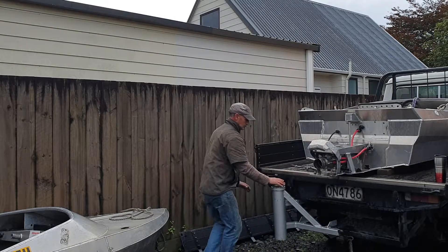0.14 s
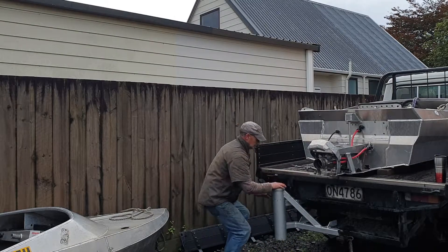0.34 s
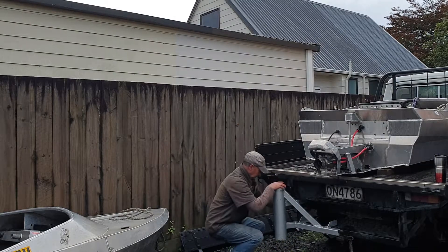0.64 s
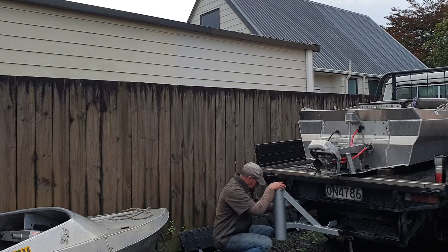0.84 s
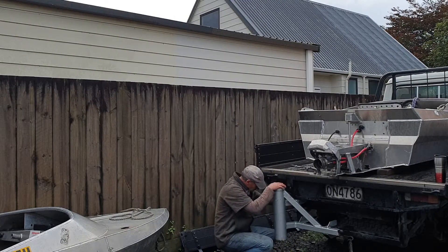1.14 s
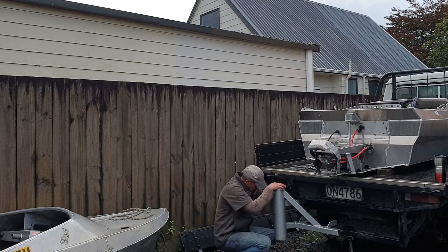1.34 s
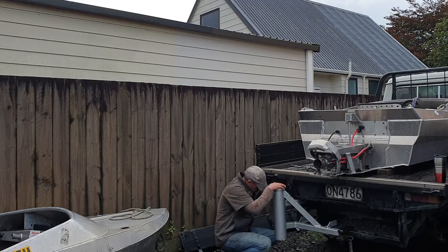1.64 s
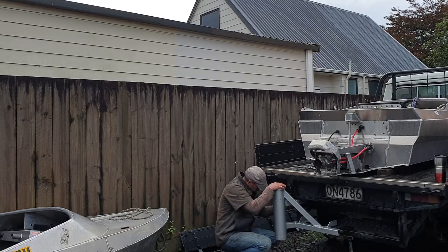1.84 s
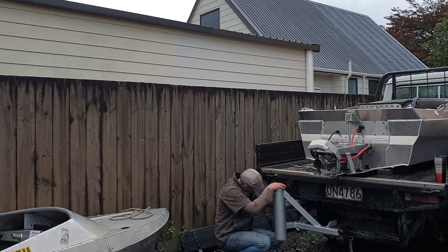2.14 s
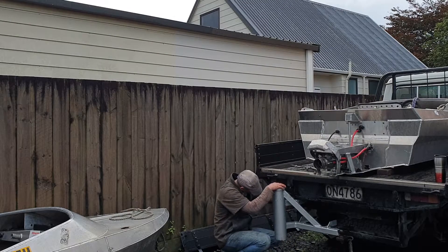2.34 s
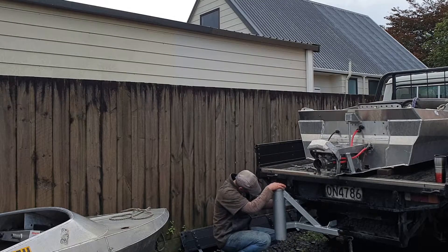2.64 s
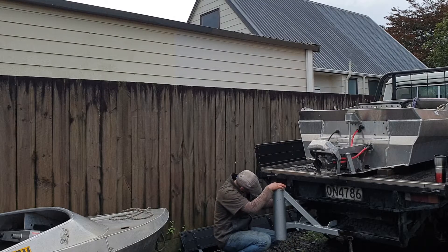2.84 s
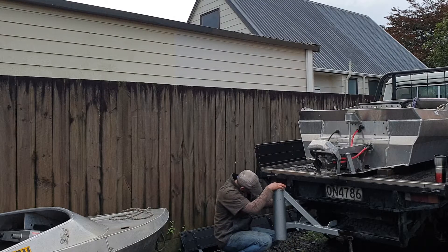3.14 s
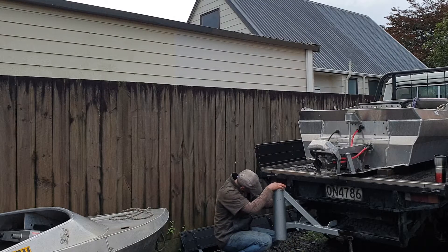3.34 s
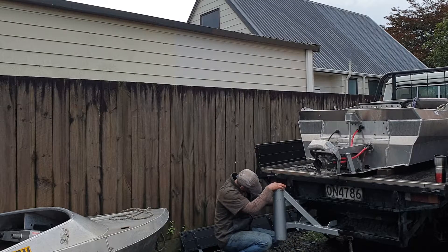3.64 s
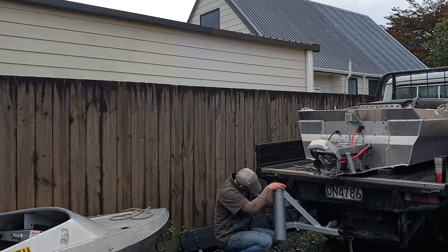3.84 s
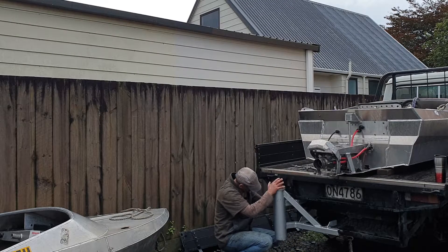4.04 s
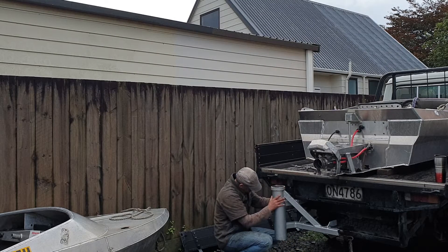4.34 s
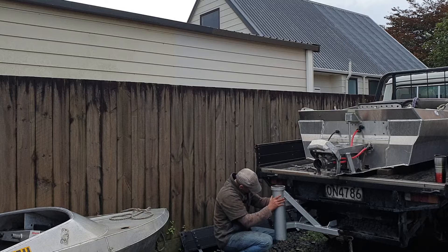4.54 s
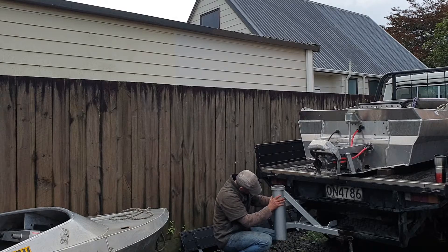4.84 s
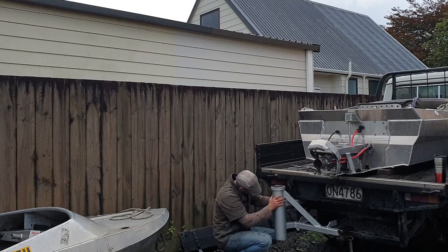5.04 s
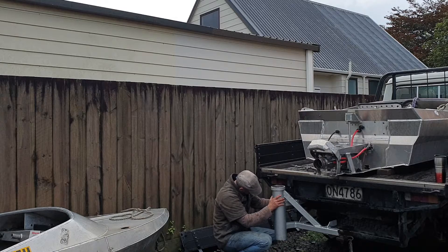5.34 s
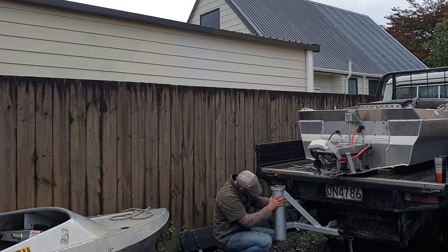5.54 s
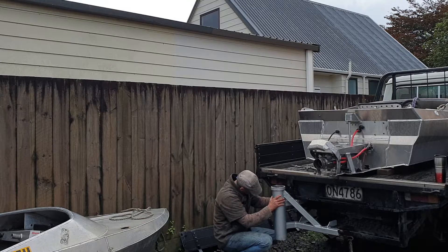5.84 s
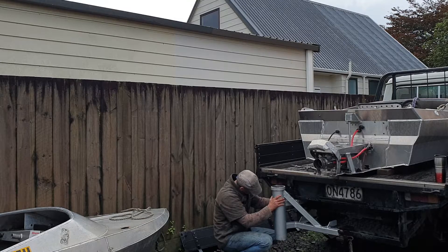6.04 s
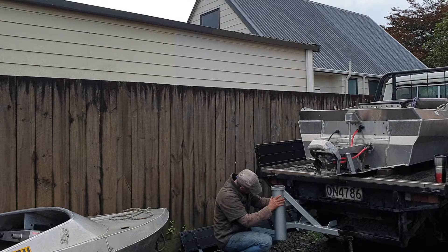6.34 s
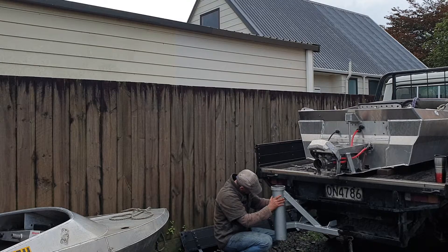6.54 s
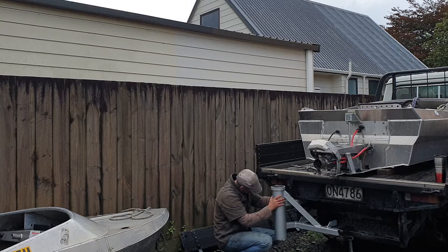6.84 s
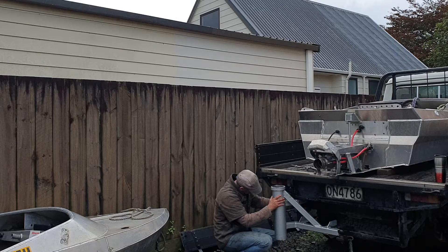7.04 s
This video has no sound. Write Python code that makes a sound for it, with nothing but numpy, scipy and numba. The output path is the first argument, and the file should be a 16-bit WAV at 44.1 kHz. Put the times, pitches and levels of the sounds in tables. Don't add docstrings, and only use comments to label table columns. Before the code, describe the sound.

A fenced yard outdoors, heard in stereo from a few metres, with faint, low town hum swelling gently throughout. From 0 to about 1.1 seconds boots shift on gravel: a crunch near 0.1, scattered stone clicks, and a sharp dry click at 0.9, fading into soft grit. At about 1.7 a steel post is twisted stiffly in a dry socket, with a longer, lower, rougher squeal that jumps to a very high pitch near 1.9, over dull rumble and scraping. Short, piercing squeaks around 6 kilohertz follow at 2.6, 3.2, 3.8, 4.5, 5.0, 5.6, 6.1 and 6.7, each about a tenth of a second, wavering slightly, with a low grinding thump beneath. The one at 3.25 is loudest. A tiny stone ticks at 2.8; faint gravel shifts near 4.1. Fence echoes and a brief tail follow each squeak. A last weak squeak at 7.2 is cut short.

```python
import sys
import numpy as np
from scipy import signal
from scipy.fft import rfft, irfft, next_fast_len
from scipy.io import wavfile
from scipy.ndimage import uniform_filter1d
from numba import njit

SR = 44100
rng = np.random.default_rng(int(sys.argv[2]) if len(sys.argv) > 2 else 0)


def wav_out(sig):
    wavfile.write(sys.argv[1], SR, np.round(np.clip(np.atleast_2d(sig).T, -1, 1) * 32767).astype(np.int16))


def ratio(d):
    e = np.asarray(d, float) / 20
    return 10 ** e


N = 317079
T = np.arange(N) / SR

# start [t/s], length [t/s], rumble [level/dB], knock re rumble [level/dB],
# second harmonic of the squeal [level/dB]
TWISTS = [
    (1.668, 0.23, -45.5, -13, -12),
    (2.586, 0.068, -36, -12.5, -8),
    (3.217, 0.11, -42.5, -11, -13.5),
    (3.81, 0.072, -38, -10.5, -5.5),
    (4.454, 0.098, -43, -14.5, -7.5),
    (5.047, 0.12, -43.5, -16, -11),
    (5.594, 0.099, -42, -16, -5),
    (6.145, 0.065, -39.5, -14, -5),
    (6.647, 0.11, -40, -15, -8),
    (7.184, .05, -46, -10.5, -11),
]


def unit(x):
    return x / np.sqrt(np.mean(x ** 2))


@njit
def svf(x, hz, width_hz):
    y, band, low = np.empty(len(x)), 0., 0.
    g, k = np.tan(np.pi * hz / SR), width_hz / hz
    for i in range(len(x)):
        v = (band + g * (x[i] - low)) / (1 + g * (g + k))
        band, low, y[i] = 2 * v - band, low + 2 * g * v, k * v
    return y


def svf_twice(x, hz, width_hz):
    return svf(svf(x, 1. * hz, 1. * width_hz), 1. * hz, 1. * width_hz)


def walk(rate_hz):
    k = int(SR / rate_hz)
    held = rng.standard_normal(8192)[np.arange(N) // k]
    return 1.93 * uniform_filter1d(uniform_filter1d(held, k), k)


def read(table):
    s, *columns = np.transpose(table)
    stop = int(s[-1] * SR) if s[-1] < T[-1] - .03 else N
    span = slice(max(int(s[0] * SR), 0), stop)
    return span, [np.interp(T[span], s, c) for c in columns]


def shape(s, hold_s, rise_db_s, fall_db_s, depth_db=45):
    start_s, stop_s = s - depth_db / rise_db_s, s + hold_s + depth_db / fall_db_s
    span = slice(max(int(start_s * SR), 0), int(stop_s * SR))
    t = T[span] - s
    return span, t, np.minimum(np.minimum(t * rise_db_s, 0), (hold_s - t) * fall_db_s)


def slip(chance, hz, harmonics_db, jitter, chatter_db):
    waver, chatter, *flutter = chance
    phase = 2 * np.pi * np.cumsum(hz * (1 + jitter * waver)) / SR
    tone = sum(ratio(db + 1.5 * flutter[k]) * np.sin((k + 1) * phase) for k, db in enumerate(harmonics_db))
    return np.sqrt(2) * tone * (1 + ratio(chatter_db) * chatter) * signal.windows.tukey(len(hz), .08)


def squeals():
    # start [t/s], hold [t/s], slip rate [f/Hz], level [level/dB],
    # left minus right [level/dB]
    upper_locks = [(1.868, 0.021, 5730, -23.5, 4), (1.894, .008, 5778, -21.5, 3.5),
                   (2.594, 0.011, 5900, -18.5, 12), (2.61, .042, 5832, -26, 9),
                   (3.253, 0.028, 6020, -14, 6.5), (3.287, .03, 6065, -25, 2.5),
                   (3.797, 0.052, 5910, -23.5, 5), (3.859, 0.032, 5670, -28.5, 11.5),
                   (4.508, .014, 6020, -25, 4.5), (4.529, 0.044, 5900, -29, 13),
                   (5.045, 0.045, 5870, -24.5, 4), (5.078, 0.027, 5830, -21.5, 13.5),
                   (5.624, 0.014, 5890, -23, 12), (5.642, 0.033, 5930, -25.5, 9.5),
                   (5.691, 0.033, 5867, -27, 12), (6.135, .018, 5958, -24, 9.5),
                   (6.158, .03, 5764, -31.5, 6.5), (6.676, 0.028, 5835, -20.5, 11),
                   (6.703, .02, 5900, -20, 7), (6.727, 0.032, 5870, -28, 7), (7.166, .03, 5880, -30.5, 3.5)]
    # start [t/s], slip rate [f/Hz], level [level/dB]
    bites = [
        (2.577, 5847, -21.5),
        (3.233, 5854, -26),
        (4.489, 5967, -30.5),
        (5.026, 5990, -32),
        (5.612, 6035, -29.5),
        (6.112, 5860, -30),
        (6.663, 5796, -27.5),
    ]
    # start [t/s], hold [t/s], level [level/dB], left minus right [level/dB]
    low_locks = [
        (1.68, .02, -33, -9),
        (1.696, .04, -19.5, -9),
        (1.703, .018, -23.5, -4.5),
        (1.727, .043, -20, -3.5),
    ]
    low_hz = [3015, 3772, 3600, 3450]
    # second, third, fourth harmonic of each low lock [level/dB]
    low_harmonics_db = [(-2, -26, -28), (-27.5, -36, -48.5), (-0.5, -13, -29.5), (-13, -22, -37)]
    # start [t/s], length [t/s], start rate [f/Hz], end rate [f/Hz], level [level/dB]
    slides = [
        (3.245, .025, 5700, 5350, -35),
        (5.10, .035, 5680, 5480, -29),
        (3.89, .03, 5650, 5480, -41.5),
        (2.605, .05, 6450, 6250, -40),
        (6.13, .04, 6500, 6400, -52),
    ]

    chatter = signal.sosfilt(signal.butter(6, 800, fs=SR, output="sos"), rng.standard_normal(N))
    chance = np.array([walk(250), unit(chatter)] + [walk(150) for _ in range(4)])
    out, starts = np.zeros((2, N)), np.array(TWISTS)[:, 0]

    def second_db(s):
        return TWISTS[np.argmin(abs(starts + .05 - s))][4]

    upper_mode = dict(sag_hz_s=402, jitter=.006, chatter_db=-24.5)
    low_mode = dict(sag_hz_s=0, jitter=.004, chatter_db=-28)
    catches = []
    for s, hold_s, hz, db, pan_db in upper_locks:
        detune_db, aside_db = .03 * max(5900 - hz, 0), .5 * (pan_db - 6.5)
        catches.append((s, hold_s, hz, db, pan_db, [second_db(s) - detune_db - aside_db], upper_mode))
    for (s, hold_s, db, pan_db), hz, harmonics_db in zip(low_locks, low_hz, low_harmonics_db):
        catches.append((s, hold_s, hz, db, pan_db, harmonics_db, low_mode))
    for s, hz, db in bites:
        catches.append((s, .016, hz, db, -0.5, [second_db(s) - 4], upper_mode))

    for s, hold_s, hz, db, pan_db, harmonics_db, mode in catches:
        span, t, fade_db = shape(s, hold_s, rise_db_s=3299.5, fall_db_s=1598)
        rate_hz = hz - mode["sag_hz_s"] * t
        tone = slip(chance[:, span], rate_hz, [0, *harmonics_db], mode["jitter"], mode["chatter_db"])
        balance_db = np.array([[1], [-1]]) * (pan_db / 2 + 2 * chance[-1, span])
        droop_db = 70.5 * t
        out[:, span] += tone * ratio(db + fade_db - droop_db + balance_db)
    for s, length_s, start_hz, end_hz, db in slides:
        span, (hz,) = read([(s, start_hz), (s + length_s, end_hz)])
        tone = slip(chance[::-1, span], hz, [db, db - 11.5], jitter=0.028, chatter_db=-8.5)
        out[:, span] += tone * ratio([[2.5], [-2.5]])
    return out


def ring(x, modes, patchy_db=0):
    return unit(sum(ratio(db + patchy_db * walk(14)) * unit(svf_twice(x, hz, 1.3 * width_hz))
                    for hz, width_hz, db in modes))


def grains(rate_hz, spread_db):
    hits = (rng.random(N) < rate_hz / SR) * rng.standard_normal(N)
    return hits * ratio(spread_db * np.minimum(rng.exponential(size=N), 3.5))


def grind():
    # centre [f/Hz], width [f/Hz], level [level/dB]
    frame = [(91, 42, -5), (129.4, 49, 3), (183, 43, -1.5), (300, 100, -1.5)]
    brace = [(477, 180, 4.5), (826.3, 70, 5)]
    tube_wall = [(1300, 620, -5.5), (1850, 500, 2.5), (2880, 1200, 2), (3613, 740, -0.5), (4370, 420, 1),
                 (7360, 740, -1)]
    # start [t/s], length [t/s], level [level/dB]
    scrapes = [
        (1.673, 0.22, -50.5),
        (2.591, 0.11, -53.5),
        (3.207, .14, -59),
        (3.797, 0.11, -50),
        (4.453, 0.11, -57),
        (5.041, 0.14, -54.5),
        (5.598, .12, -58.5),
        (6.121, 0.11, -54.5),
        (6.643, .11, -58),
        (7.162, .05, -60),
    ]

    out = np.zeros((2, N))
    catches, rasp = unit(grains(900, 3.0)), unit(grains(2500, 3.0))
    layers = np.array([[ring(catches + 0.15 * own, frame, patchy_db=2.0),
                        ring(catches + 1.1 * own, brace, patchy_db=2.5),
                        ring(rasp + 1.4 * own, tube_wall, patchy_db=3.0)] for own in rng.standard_normal((2, N))])
    for s, length_s, db, knock_db, _ in TWISTS:
        span, t, fade_db = shape(s, length_s, rise_db_s=451, fall_db_s=101)
        swell_db = 5 * (np.clip(t / length_s, 0, 1) - 1)
        out[:, span] += ratio(db + fade_db + swell_db) * layers[:, 0, span]
        span, t, fade_db = shape(s, length_s, rise_db_s=451, fall_db_s=198.5)
        out[:, span] += ratio(db + knock_db + fade_db - 39 * t) * layers[:, 1, span]
    for s, length_s, db in scrapes:
        span, t, fade_db = shape(s, length_s, rise_db_s=899, fall_db_s=297)
        out[:, span] += ratio(db + fade_db + np.array([[-1.5], [1.5]])) * layers[:, 2, span]
    return out


def rings():
    # start [t/s], length [t/s], centre [f/Hz], width [f/Hz], level [level/dB]
    wall_modes = [(1.63, .04, 2700, 120, -59.5), (2.66, .11, 3500, 70, -62.5), (3.4, .28, 4790, 200, -73.5),
                  (3.79, .06, 2050, 200, -55), (6.64, .07, 800, 50, -51), (5.62, .06, 4500, 150, -54),
                  (1.78, .1, 800, 60, -58), (6.7, .05, 1850, 80, -61.5), (2.03, .06, 2800, 200, -72),
                  (4.62, .09, 2400, 250, -73), (2.545, .035, 5860, 150, -57), (3.16, .07, 4700, 300, -67),
                  (6.25, .15, 2900, 600, -73)]
    # start [t/s], length [t/s], level [level/dB]
    grit_puffs = [
        (3.791, .03, -56.5),
        (4.5, .07, -58.5),
        (5.12, .08, -68.5),
        (5.6, .03, -60),
    ]
    # centre [f/Hz], width [f/Hz]
    puff_bands = [(9000, 2500), (14200, 2000)]

    out, noise = np.zeros(N), rng.standard_normal(N)
    puffs = [(s, length_s, hz, width_hz, db) for s, length_s, db in grit_puffs for hz, width_hz in puff_bands]
    for s, length_s, hz, width_hz, db in wall_modes + puffs:
        span = slice(int(s * SR), int((s + length_s) * SR))
        tone = unit(svf_twice(noise[span], hz, width_hz))
        out[span] += ratio(db) * tone * signal.windows.tukey(len(tone), .6)
    return out


def boots():
    # loudest [t/s], time to die away [t/s], crunch [level/dB], thud and grit re crunch [level/dB]
    steps = [(0.049, 0.2, -58, 1, -1), (.13, .2, -47.5, -3.5, -12), (0.249, 0.095, -65.5, -13, 4),
             (0.462, 0.12, -56, -5, -7), (.6, 0.58, -70.5, 12.5, 1), (.915, 0.23, -63.5, 6, -20),
             (1.05, 0.87, -61.5, -1.5, -12.5), (2.822, 0.072, -81, 9, 13.5), (4.22, .25, -73, 1, -4),
             (2.0, 0.42, -69, 2, -8.5), (4.02, .3, -71, 0, -4)]
    # start [t/s], click [level/dB], ring [f/Hz], thud re click [level/dB]
    stones = [
        (0.09, -40, 1920, 2.5),
        (0.1171, -35, 1730, 2.5),
        (0.3018, -43, 1740, -7),
        (0.381, -44, 2480, -26),
        (0.4389, -43.5, 1480, -3),
        (0.4873, -38, 1700, -20.5),
        (0.8917, -45, 2070, -40),
        (0.9145, -33.5, 1960, -38),
        (1.0101, -43, 4400, -15),
        (2.8194, -52.5, 5840, -35.5),
    ]

    out = np.zeros((2, N))
    grit = unit(grains(2000, 1.2))
    # (f/Hz, width/Hz, level/dB)
    thud_modes = [(158, 110, -0.82), (560, 530, -1.2)]
    crunch_modes = [(1540, 610, 2.8), (1990, 760, 0.5), (4444, 2500, 5.6)]
    fine_modes = [(7010, 3600, 0.28), (9850, 2100, -1), (13500, 3060, -0.88)]
    for port in out:
        heard = grit + 1.2 * rng.standard_normal(N)
        thud, crunch, fine = (ring(heard, modes) for modes in (thud_modes, crunch_modes, fine_modes))
        for s, dying_s, db, thud_db, grit_db in steps:
            fall_db_s = 20 / dying_s
            span, _, fade_db = shape(s, 0, fall_db_s / .5, fall_db_s, depth_db=29)
            step = crunch[span] + ratio(thud_db) * thud[span] + ratio(grit_db) * fine[span]
            port[span] += ratio(db + fade_db) * step
    t = T[:2048]
    for s, db, hz, thud_db in stones:
        noise = rng.standard_normal(len(t))
        tick = 0.76 * svf(noise, 4690.0, 8000.) * np.exp(-t / 0.0023)
        tone = 2.0 * svf(noise, 1. * hz, 470.0) * np.exp(-t / 0.02)
        thud = 7.6 * svf(noise, 460.0, 300.0) * np.exp(-t / 0.023)
        i = int(s * SR)
        out[:, i:i + len(t)] += ratio(db - 4.5) * (tick + tone + ratio(thud_db) * thud)
    return out


def fence(direct):
    # delay [t/s], level [level/dB]
    echoes = [
        (.009, -10),
        (.021, -13),
    ]

    size, lag_samples = next_fast_len(N), 2.71
    turn = np.exp(-2j * np.pi * lag_samples * np.arange(size // 2 + 1) / size)
    near = np.array([irfft(rfft(direct[0], size) * turn, size)[:N], direct[1]])
    for k, (s, db) in enumerate(echoes):
        i = int(s * SR)
        near[:, i:] += ratio(db) * np.array([direct[0], np.roll(direct[1], 5 - 9 * k)])[:, :-i]
    return near


@njit
def walls(x, lags, gain, damp):
    line, soft, out = np.zeros((8, 4096)), np.zeros(8), np.zeros((2, len(x)))
    for i in range(len(x)):
        total = 0.
        for k in range(8):
            soft[k] += (1 - damp) * (gain[k] * line[k, (i - lags[k]) & 4095] - soft[k])
            total += soft[k]
            out[k % 2, i] += soft[k] * (1 - (k & 2))
        for k in range(8):
            line[k, i & 4095] = x[i] + soft[k] - total / 4
    return out


def yard(direct):
    t60_s, level_db = 0.42, -19
    lags = rng.integers(500, 2400, 8)
    source = direct.mean(axis=0) + 1e-18
    late = walls(source, lags, ratio(-60 * lags / SR / t60_s), .08)
    return ratio(level_db + np.array([[1.5], [-1.5]])) * late


def hum():
    # frequency [f/Hz], density [level/dB per Hz]
    spectrum = [(18, -35.5), (30, -2), (81, 0.5), (173, -10), (292, -8), (505, -16.5), (709, -14),
                (1360, -37), (1640, -33.5), (5170, -45), (5900, -35.5), (7460, -41), (8500, -54),
                (12600, -42.5), (15500, -49.5)]
    # frequency [f/Hz], coherence [0..1]
    likeness = [(60, 0.94), (290, 0.87), (640, 0.076), (1400, 0.0033)]
    # time [t/s], level [level/dB]
    traffic = [(0, 6), (1, 0.5), (1.6, 1.5), (2.3, -3), (3, 1.5), (3.7, -3.5), (4.3, -1.5), (5, 0.5),
               (6, -2.5), (6.6, -2.5), (7.19, 0)]

    out, swell, traffic_db = 0, walk(0.91), read(traffic)[1][0]
    (f, density_db), (like_hz, like) = np.transpose(spectrum), np.transpose(likeness)
    for hz in 33 * 2 ** np.arange(0, 9.2, .4):
        mid, side = (unit(svf_twice(rng.standard_normal(N), hz, hz / 3)) for _ in range(2))
        c = np.clip(np.interp(np.log(hz), np.log(like_hz), like), 0, .99)
        band_db = np.interp(np.log(hz), np.log(f), density_db) + 10 * np.log10(hz)
        db = band_db + 1.0 * swell + c * traffic_db + 1.2 * walk(6.3)
        out = out + ratio(db) * (np.sqrt(1 + c) * mid + np.sqrt(1 - c) * side * np.array([[1], [-1]]))
    return unit(out) * ratio(-55 + np.array([[1.8], [-1.8]]))


def scene():
    post = squeals() + (grind() + rings()) * ratio([[1.7], [-1.7]])
    direct = post + boots() * ratio([[1.5], [-1.5]])
    return fence(direct) + yard(direct) + hum()


def top_cut(x):
    return signal.sosfilt(signal.butter(12, 15660, fs=SR, output="sos"), x)


def record(dry):
    # low edge [f/Hz], high edge [f/Hz]
    dropout_bands = [(7300, 10100), (13400, 15600)]

    heard = signal.sosfilt(signal.butter(2, 40, "high", fs=SR, output="sos"), dry)
    heard = heard - 0.19 * np.array([svf(port, 8000.0, 2000.0) for port in heard])
    squeal = signal.sosfilt(signal.butter(4, 2500, "high", fs=SR, output="sos"), heard)
    squeal_power = uniform_filter1d(squeal ** 2, size=1024)
    dropout_db = -41
    for edges_hz in dropout_bands:
        band = signal.sosfiltfilt(signal.butter(5, edges_hz, "band", fs=SR, output="sos"), heard)
        starved = uniform_filter1d(band ** 2, size=1024) < squeal_power * ratio(2 * dropout_db)
        heard = heard - band * uniform_filter1d(1. * starved, size=512)
    return top_cut(heard)


dry = scene()
out = record(dry)
wav_out(out)
```